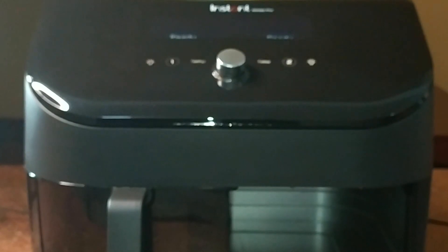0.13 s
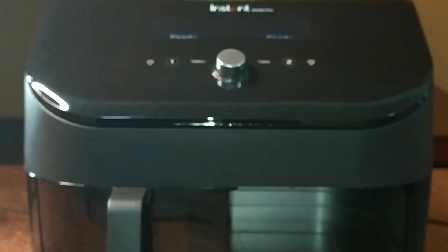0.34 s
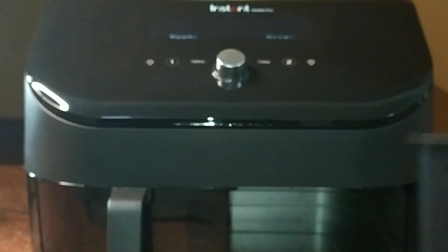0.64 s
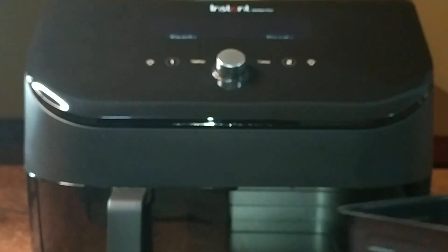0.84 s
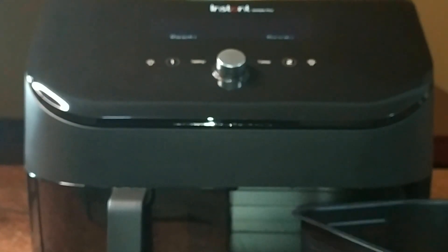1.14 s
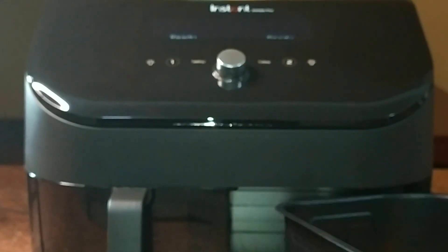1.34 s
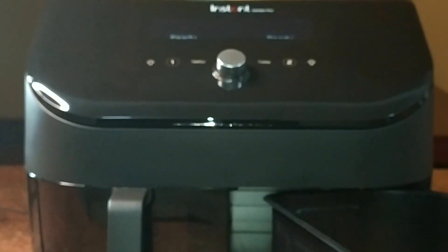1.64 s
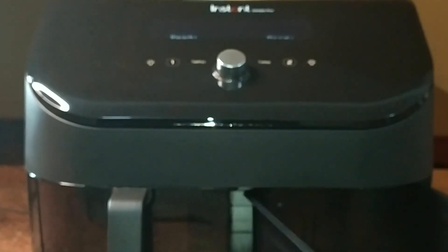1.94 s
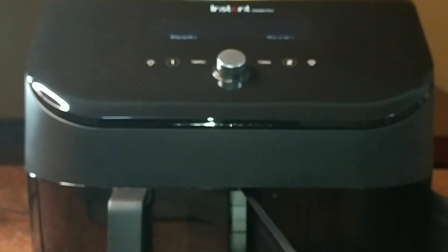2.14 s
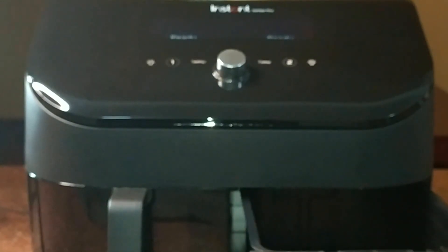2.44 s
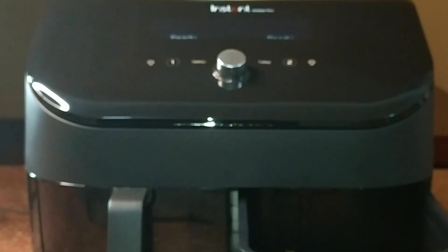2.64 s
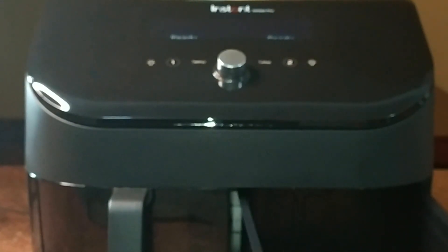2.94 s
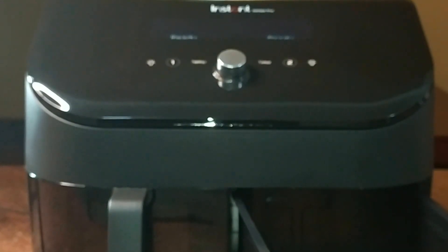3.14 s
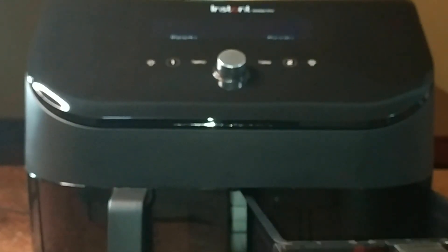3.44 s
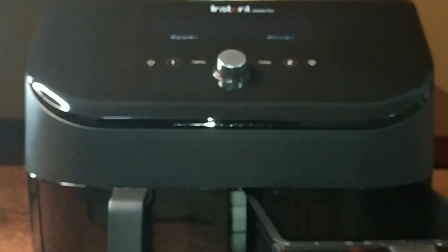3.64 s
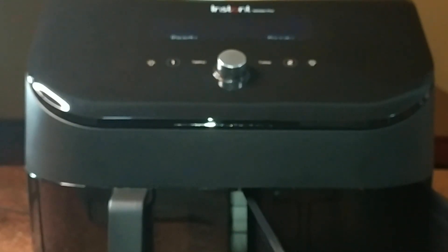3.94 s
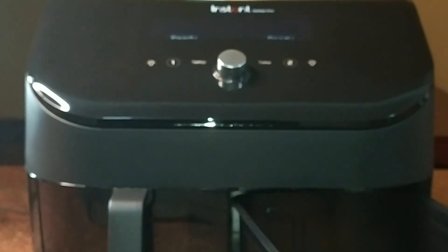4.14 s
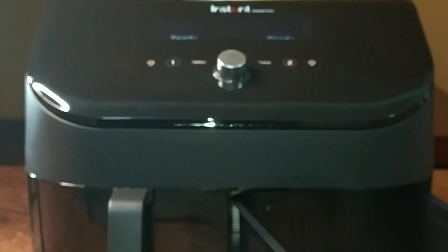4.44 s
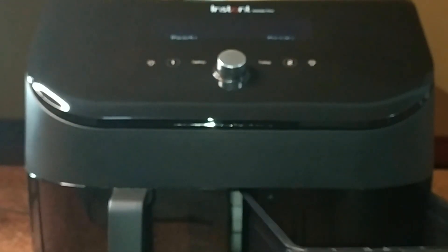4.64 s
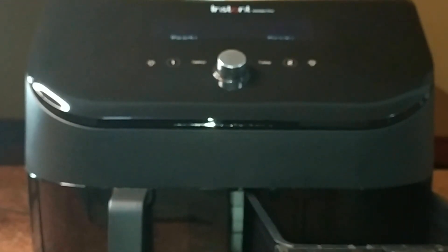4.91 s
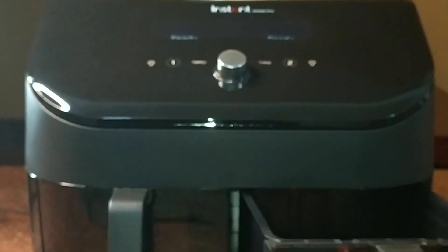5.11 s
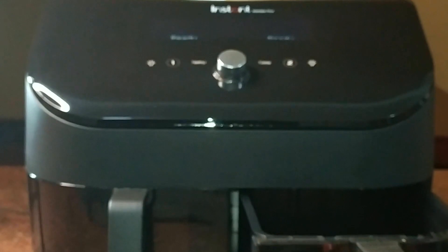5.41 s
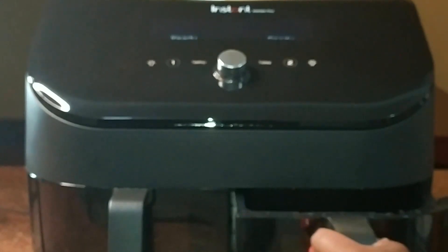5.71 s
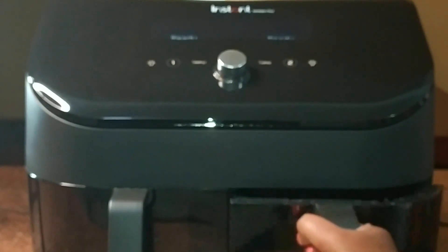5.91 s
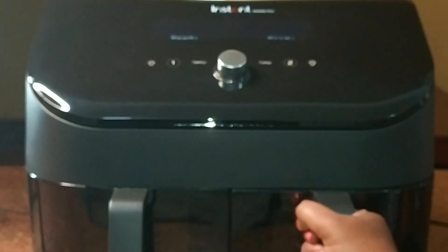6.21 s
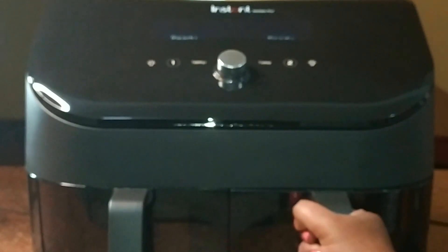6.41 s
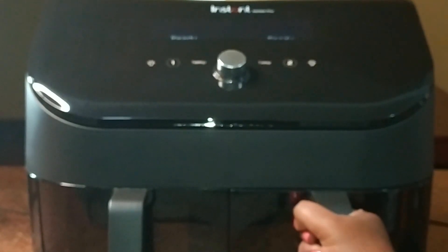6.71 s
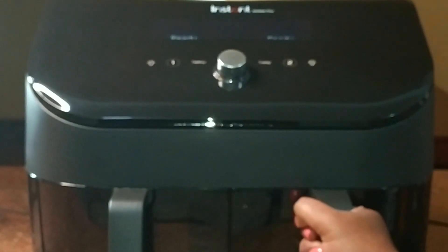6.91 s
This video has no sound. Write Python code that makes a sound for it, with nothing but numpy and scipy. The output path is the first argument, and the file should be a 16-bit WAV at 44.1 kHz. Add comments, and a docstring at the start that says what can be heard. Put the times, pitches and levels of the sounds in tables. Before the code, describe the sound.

Over a constant appliance hum, a hollow metal drawer bumps and drags along its runners, thuds home and its catch snaps closed.

```python
"""A steady appliance hum with faint whines and hissing air fills a kitchen, then comes a faint dull bump.
On the counter a metal air fryer basket is fed into its plastic bay: it catches on the opening, knocks
several times and scrapes along the runners, then is pushed home, where the catch snaps shut.
Blows are decaying modes and noise bursts, sliding is trains of tiny slips, the hum is sines over noise.
Direct sound and room reflections reach a left and a right side."""
import sys
import numpy as np
from scipy import signal
from scipy.fft import rfft, irfft, next_fast_len
from scipy.io import wavfile

SR = 44100
rng = np.random.default_rng(int(sys.argv[2]) if len(sys.argv) > 2 else 0)


def transcribe(signal):
    """Save signal, clipped to [-1, 1], as a 16-bit WAV file at the path in sys.argv[1]."""
    frames = np.atleast_2d(signal).T
    limited = np.clip(frames, -1, 1)
    pcm = np.round(limited * 32767).astype(np.int16)
    wavfile.write(sys.argv[1], SR, pcm)


N = 311342
TIME = np.arange(N) / SR
TAIL = TIME[:SR * 3 // 4]   # time axis of a single decay
CUTOFF_HZ = 15000
HUM_HZ = 445.2

# All dB below are before the gains set in the functions; decay times (t60) are those before any shortening.

# Motor hum. Each row: time in seconds, level in dB.
HUM_LEVEL = [(0, -50.5), (.8, -48), (1.5, -49.5), (4, -50), (7, -50)]
# Faint companions of the hum. Each row: pitch in Hz, rms level in dB.
WHINES = [(148.5, -72.5), (693, -81), (841.6, -80), (1236, -89), (4107, -81), (8087, -78), (8318, -83)]
# Colour of the moving air. Each row: frequency in Hz, relative level in dB.
AIR_COLOUR = [(20, -73), (50, -77), (100, -87), (135, -84), (150, -98), (170, -80.5), (300, -85),
              (600, -89), (1300, -100), (2100, -101), (2700, -89.5), (3300, -95), (3850, -104), (4130, -93),
              (4400, -102), (12000, -115)]
# Colour of the high background hiss. Each row: frequency in Hz, relative level in dB.
AIR_HISS_COLOUR = [(3000, -10.5), (5000, -15.5), (6600, -12), (7500, -0.5), (8200, 4.5), (9000, -1.5),
                   (10500, -4), (11500, -16.5), (15000, -24)]
# Course of that high hiss. Each row: time in seconds, level in dB.
AIR_HISS_LEVEL = [(0, -67.5), (.3, -66), (.8, -65), (1.3, -67), (1.8, -69), (7, -67)]

# Left-right likeness of diffuse sound. Each row: frequency in Hz, coherence from 0 to 1.
LIKENESS = [(30, 0.082), (130, 1), (320, 0.83), (500, 0.6), (950, 0.032), (2000, 0.073), (4500, 0.0091),
            (12000, 0.0099)]
# The basket's side. Each row: frequency in Hz, left minus right in dB.
SIDE_LEVEL = [(150, 0.5), (320, -0.5), (500, 3), (750, 1), (1090, 0), (1500, 0.5), (4500, 0), (9000, -3),
              (13000, 5)]
# Phase between the sides. Each row: frequency in Hz, lead of the left in radians.
SIDE_LEAD = [(150, 0.013), (320, -0.21), (500, 0.23), (900, -0.62), (2000, -0.63)]
# Colours of the room's ring and of its quick reflections. Each row: frequency in Hz, relative level in dB.
ROOM_COLOUR = [(100, 0.0), (250, 1.5), (500, -1.5), (1000, 6.0), (3000, -1.5), (10000, -4.0), (15000, -1)]
EARLY_COLOUR = [(100, -16.0), (600, 1.5), (2000, 0.5), (9000, 2.0)]

# Colour of the bump at pick-up. Each row: frequency in Hz, relative level in dB.
LIFT_COLOUR = [(100, -21), (200, 9), (500, -4), (1000, -8), (1500, -15), (3000, -17)]

# The basket's broad floor. Each row: frequency in Hz, level in dB, t60 in seconds.
FLOOR_MODES = [(235, 4, 0.33), (303.4, 5.5, 0.34), (357, -1.5, 0.27), (393, 2, 0.36), (417, -11, 0.35),
               (439.1, 10.5, 0.28), (495, 7.5, 0.27), (532.7, 6.5, 0.48), (694, 3, 0.099)]
# Its stiffer walls. Each row: frequency in Hz, level in dB, t60 in seconds.
WALL_MODES = [(841, 4, 0.4), (880, 3.5, 0.69), (1087, 4, 0.41), (1190, -13, 0.17), (1336, -20, 0.79),
              (1360, -28, .25), (1520, -12.5, 0.21), (1687, -10.5, 0.43), (2090, 2, 0.081), (2530, -27, .2)]
# The heavily damped first swing of a blow. Each row: ratio to the thud pitch, level in dB, t60 in seconds.
THUD_MODES = [(.66, -13.5, 0.053), (.85, -13, 0.13), (1.04, 0.5, 0.065)]
# The plastic casing's short ring. Each row: frequency in Hz, level in dB, t60 in seconds.
CASING_MODES = [(804, 0.5, 0.14), (1020, -35, 0.035), (1162, -8.5, 0.094), (1340, -27, 0.0085),
                (1740, -16, 0.034), (2105, 8, 0.0077), (2500, 0.5, 0.023), (2730, -43, 0.033)]
# The hollow casing's low ring. Each row: frequency in Hz, level in dB, t60 in seconds.
BOOM_MODES = [(155.2, -4, 0.33), (171.5, -6, 0.26), (238.4, 0, 0.29), (304.6, 5, 0.23)]
# Colour of the casing boom. Each row: frequency in Hz, relative level in dB.
BOOM_COLOUR = [(60, -37), (105, -42), (155, 2.5), (200, -9.5), (250, -2.5), (330, -12), (500, -7),
               (900, -70)]
# Colour of the plastic clack. Each row: frequency in Hz, relative level in dB.
CLACK_COLOUR = [(300, -33.5), (650, -7), (1000, 7.5), (1500, 3.5), (2000, 1), (2600, 0), (3050, -3),
                (6000, -8.5), (12000, -56)]
# Colour of the rim's tick. Each row: frequency in Hz, relative level in dB.
TICK_COLOUR = [(1500, 14), (3000, -5), (5000, -2), (7000, -3), (9200, 6.5), (10500, 0), (12000, -39),
               (15000, -52)]

# The hand feeds the basket in by short pushes. Each row: start of full speed in seconds, run-up in seconds,
# hold in seconds, speed as hiss in dB, pressure on the runners in dB.
PUSHES = [(1.97, 0.05, 0.058, -76, 29.5), (2.11, 0.13, 0.018, -47.5, 2), (2.19, 0.041, 0.026, -67.5, 28),
          (2.305, 0.17, 0.087, -42, 9.5), (2.46, 0.14, 0.12, -53.5, 9.5), (2.6, 0.31, 0.21, -59, 5.5),
          (3.087, .14, 0.071, -39.5, -1.5), (3.241, 0.036, 0.021, -42.5, 13),
          (3.371, 0.1, 0.037, -54.5, 19), (3.54, 0.24, 0.041, -51.5, 11), (3.641, 0.11, 0.024, -37, -1.5),
          (3.75, 0.038, 0.022, -70, 24), (3.87, 0.21, 0.016, -53.5, -1), (4.079, 0.089, 0.23, -42.5, -1),
          (4.55, 0.092, 0.23, -54, 16), (4.914, 0.13, 0.011, -40.5, 4.5), (5.031, 0.015, 0.2, -53.5, 7),
          (5.31, 0.12, 0.067, -44.5, 1), (5.699, 0.3, 0.28, -46, 2.5), (6.1, 0.15, 0.012, -64.5, 16.5),
          (6.219, 0.054, 0.058, -53.5, 14.5)]
RUN_DOWN = 0.49   # a push dies away over this many times its run-up
# Once the runners carry the basket, the vibration leaves its floor for the casing.
SEATED_S, SEATING_S, SEATED_CASING_DB, SEATED_FLOOR_DB = 5.95, 0.15, 13.5, -5
# Colour of the sliding hiss. Each row: frequency in Hz, relative level in dB.
HISS_COLOUR = [(1500, -8), (3300, -6.5), (5000, -13), (7000, -7.5), (9300, 1), (10500, -5), (12000, -18),
               (15000, -36)]
# Colour of the sliding rasp. Each row: frequency in Hz, relative level in dB.
RASP_COLOUR = [(60, -35.5), (250, -43), (500, 18), (680, -4), (870, 17), (1250, -0.5), (2000, 8.5),
               (2650, 12.5), (3200, -20), (5000, 6), (10000, -33)]
# Colour of the casing's rumble under sliding. Each row: frequency in Hz, relative level in dB.
RUMBLE_COLOUR = [(70, -11.5), (115, -8.0), (152, 14.0), (172, 20.5), (205, -16), (300, 9), (380, -2.0),
                 (800, -58)]
# The drawer's plastic sides rub the mouth of the bay. Each row: loudest time in seconds, length in seconds,
# level in dB.
RUBS = [(4.119, 0.15, -46), (5.97, 0.31, -55.5), (6.225, 0.3, -56)]
# Colour of those rubs. Each row: frequency in Hz, relative level in dB.
RUB_COLOUR = [(600, -7), (1300, 0), (2400, -6), (3500, -3), (7000, -4), (11000, -10), (13000, -40)]
# Resonances that bits of grit set off between rim and runner. Each row: frequency in Hz, level in dB.
GRIT_MODES = [(880, -0.5), (1120, -13), (1480, 2), (1900, 1.5), (2300, -6), (2600, 1.5), (2780, 0),
              (3700, -5)]
# The rim skids along the opening. Each row: start in seconds, level in dB, t60 in seconds.
SKIDS = [(2.03, -50, 0.11), (2.24, -31, 0.056), (2.371, -50, 0.094), (2.995, -59, .08), (3.105, -38, 0.21),
         (3.237, -41, 0.13), (4.264, -32.5, 0.1), (4.682, -33.5, 0.065)]
# Colour of the skidding rim. Each row: frequency in Hz, relative level in dB.
SKID_COLOUR = [(600, -9), (1300, 9), (2100, 1.5), (2650, 3.5), (3300, -6), (6000, -5), (9300, -1),
               (11000, -6), (13000, -64)]
# Stick-slip groans of the basket floor. Each row: loudest time in seconds, length in seconds, pitch in Hz,
# level in dB.
GROANS = [(3.584, 0.089, 495, -42.5), (4.79, 0.16, 440.7, -44.5), (4.859, 0.18, 439.4, -34),
          (5.676, 0.037, 520, -40.5), (5.705, 0.033, 535, -36.5), (5.738, 0.11, 530, -38)]

# Small dry ticks, alone or at the sharp start of a knock or bump. Each row: start in seconds, level in dB,
# pitch in Hz, treble in dB relative to that pitch.
TICKS = [(1.9186, -28.5, 2090, -22.5), (2.154, -28, 1690, -28), (2.237, -25.5, 2530, -13),
         (2.273, -30.5, 2500, -22), (2.317, -37, 2600, -14), (2.333, -32, 1300, -12),
         (2.349, -33, 2500, -6), (3.126, -27, 1510, 3), (3.246, -29.5, 1500, -9), (3.368, -33, 1220, -26),
         (3.634, -32, 2200, -5), (4.2677, -22, 1500, -1.5), (4.283, -26, 2100, -19),
         (5.975, -42, 1200, -19), (5.989, -33, 1190, -31), (6.1779, -32, 1437, -25),
         (6.2508, -33, 1500, -13), (6.259, -29.5, 1300, -4), (6.318, -49.5, 1300, -17),
         (6.398, -26.5, 1980, -27.5), (6.8998, -33.5, 1910, -28)]
# The drawer's plastic front meets the casing. Each row: start in seconds, thud in dB, casing boom in dB,
# snap in dB, snap pitch in Hz.
BUMPS = [(6.398, -31.5, -30, -29.5, 1720), (6.422, -47, -34.5, -52, 1290), (6.846, -57, -50.5, -44, 1140),
         (6.894, -50, -51, -43, 1700), (6.8999, -32, -50, -32, 1540), (6.917, -43, -43, -45, 1100),
         (6.936, -29, -38, -42, 1100)]
# Colour of that snap. Each row: ratio to the snap pitch, relative level in dB.
SNAP_SHAPE = [(.25, 2.5), (.55, 0), (.85, 1.5), (1.35, -6), (1.6, -12), (2, -15), (5, -51)]
# The drawer rides over its catch and seats. Each row: start in seconds, thump in dB, crack in dB, spring in dB.
CATCH = [(7.0135, -38, -33, -28), (7.0222, -24, -28, -30), (7.0443, -24, -17.5, -2)]
# Colour of the plastic crack. Each row: frequency in Hz, relative level in dB.
CRACK_COLOUR = [(300, -19), (1100, -10.5), (2200, -11.5), (2900, -13.5), (4000, -20.5), (7000, -21.5),
                (9200, -24), (10500, -20), (12000, -36), (15000, -38)]
# Colour of the rattling spring. Each row: frequency in Hz, relative level in dB.
SPRING_COLOUR = [(6000, -13), (8200, -6), (9150, -1), (10200, -10), (11000, -12), (12500, -36),
                 (15000, -55)]
# The metal basket hits the bay. Each row: start in seconds, strength in dB, thud pitch in Hz, hardness of the
# contact in dB, how freely the walls ring in dB, time to the rebound in seconds, change per rebound in dB,
# casing boom in dB.
KNOCKS = [(1.919, -28.5, 551, 8, 4, .017, -23, -33.5), (2.028, -32, 544, 1.5, 2, .018, -9, -40),
          (2.155, -27, 517, 0, 1, .021, -7, -33), (2.230, -20.5, 465, -13, -11, .032, -9, -30),
          (2.372, -15.5, 496, -5, -26, .0039, 0.5, -43), (2.423, -26, 480, 4, -16, .022, -4, -44),
          (2.993, -35, 494, -17, -12, .004, -2.5, -76), (3.103, -7, 455, -3.5, -11.5, .0108, -2, -41),
          (3.151, -17, 470, -25, -6.5, .014, -6.5, -46), (3.181, -18.5, 448, -12, -3, .023, -3.5, -40),
          (3.311, -21, 505, -4, -2, .021, -7, -32.5), (3.704, -20, 397, -3.5, -8, .016, -4.5, -40),
          (4.266, -5.5, 500, -4, -4, .0235, -6, -32), (4.298, -10.5, 520, -10, -23, .028, -14, -34),
          (4.681, -23, 483, -8, -2, .014, -2, -38), (4.768, -31, 470, -5, 6.5, .018, -4.5, -48),
          (4.958, -19.5, 490, -1, -4, .01, -9.5, -42), (5.113, -11, 470, -9, -9.5, .015, -5.5, -26.5),
          (5.808, -34, 505, -17, -3, .018, -11, -42.5), (5.882, -32.5, 450, -16, 0, .018, -9, -40.5),
          (5.994, -22.5, 340, -16, -11, .023, -7.5, -35.5), (6.065, -30.5, 378, -1, -19, .03, -11, -40),
          (6.179, -28.5, 404, 0, -7, .019, -12, -38), (6.253, -21.5, 374, -1.5, -11, .008, -11, -40)]
REBOUND_PITCH = 0.955   # each rebound thuds lower than the touch before


def from_db(db):
    """Decibels to gain."""
    return 10 ** (np.asarray(db) / 20)


def rms_one(x):
    """Scale to rms 1."""
    return x / np.sqrt(np.mean(x ** 2) + 1e-20)


def in_time(rows):
    """Read a curve of (seconds, value) at every sample."""
    s, value = np.transpose(rows)
    return np.interp(TIME, s, value)


def at_hz(points, hz):
    """Read a table on a log-frequency axis."""
    f, value = np.transpose(points)
    return np.interp(np.log(hz + 1), np.log(f), value)


def dying(t60):
    """A free decay, 60 dB down after t60 seconds."""
    return np.exp(-np.log(1000) * TAIL / t60)


def swelling(s, length):
    """A rise and fall centred on a time."""
    return np.cos(np.pi * np.clip((TIME - s) / length, -.5, .5))


def drift(rate):
    """Smooth chance with rms 1, from a new random value `rate` times a second."""
    knots = rng.standard_normal(int(N / SR * rate) + 2)
    return rms_one(np.interp(TIME * rate, np.arange(len(knots)), knots))


def colour(x, spectrum):
    """Give a steady signal a spectrum; rms 1."""
    length = x.shape[-1]
    size = next_fast_len(length)
    gain = from_db(at_hz(spectrum, np.fft.rfftfreq(size, 1 / SR)))
    return rms_one(irfft(rfft(x, size) * gain, size)[..., :length])


def diffuse(size):
    """White stereo noise from all round: most alike in the bass, nearly unrelated in the treble."""
    padded = next_fast_len(size)
    alike = np.clip(at_hz(LIKENESS, np.fft.rfftfreq(padded, 1 / SR)), -1, 1)
    mid, side = rfft(rng.standard_normal((2, padded)))
    pair = np.sqrt(1 + alike) * mid + np.sqrt(1 - alike) * side * [[1], [-1]]
    return rms_one(irfft(pair, padded)[:, :size])


def ringing(modes, spread_db=0, shorten=1, pitch=1):
    """Modes struck together; the place of contact gives each its own strength."""
    strengths = spread_db * rng.standard_normal(len(modes))
    out = np.zeros(len(TAIL))
    for (hz, db, t60), own in zip(modes, strengths):
        out += from_db(db + own) * np.sin(2 * np.pi * hz * pitch * TAIL) * dying(t60 * shorten)
    return out


def burst(spectrum, t60):
    """Many crowded modes that die together, as coloured noise under one decay."""
    return colour(rng.standard_normal(len(TAIL)), spectrum) * dying(t60)


def radiate(x, edge_hz):
    """A small body sends out little below its lowest resonance."""
    return signal.sosfilt(signal.butter(4, edge_hz, "high", fs=SR, output="sos"), x)


def add(track, s, sound):
    """Mix a sound in at a time in seconds."""
    start = int(s * SR)
    track[start:start + len(sound)] += sound[:max(N - start, 0)]


def appliance(air_db=-64, hiss_db=4.0, hum_lead=0.59, hum_lean_db=-.5, whine_flutter_db=2.5):
    """A motor hums on one clean note, with faint whines, moving air and a high hiss."""
    phase = 2 * np.pi * HUM_HZ * TIME + .05 * drift(3.7)
    lean = np.array([[hum_lean_db], [-hum_lean_db]])
    level = from_db(in_time(HUM_LEVEL) + 0.083 * drift(0.33) + lean)
    out = np.sqrt(2) * level * np.sin(phase + np.array([[hum_lead], [0]]))   # the left leads, in radians
    for hz, db in WHINES:
        wander = np.cumsum(drift(29)) / SR * (1 + 0.0018 * hz)   # in cycles
        flutter = from_db(db + whine_flutter_db * drift(45))
        side_phase = rng.uniform(0, np.pi, (2, 1))
        out += np.sqrt(2) * flutter * np.sin(2 * np.pi * (hz * TIME + wander) + side_phase)
    out += from_db(air_db) * colour(diffuse(N), AIR_COLOUR)
    return out + from_db(in_time(AIR_HISS_LEVEL) + hiss_db) * colour(diffuse(N), AIR_HISS_COLOUR)


def kitchen(x, wet_db, t60=0.58, early_t60=0.17, early_db=-1, shade_db=-6):
    """Direct sound, quick reflections from counter and wall, then the ring of the room."""
    late = colour(diffuse(len(TAIL)), ROOM_COLOUR) * (dying(t60) - dying(0.016))
    early = colour(diffuse(len(TAIL)), EARLY_COLOUR) * (dying(early_t60) - dying(0.0027))
    reflections = rms_one(late) + from_db(early_db) * rms_one(early)
    response = from_db(wet_db) * reflections / np.sqrt(len(TAIL))
    size = next_fast_len(N + len(TAIL))
    hz = np.fft.rfftfreq(size, 1 / SR)
    direct = from_db(at_hz([(700, 0.0085), (4500, shade_db)], hz))   # the bay hides treble from the direct path
    sides = np.array([[.5], [-.5]])
    lean = from_db(at_hz(SIDE_LEVEL, hz) * sides) * np.exp(1j * at_hz(SIDE_LEAD, hz) * sides)
    return irfft(rfft(x, size) * (direct + rfft(response, size)) * lean, size)[:, :N]


def shifting(x, wet_db, sway_s=1.1017):
    """As the basket moves, its sound passes back and forth between two reflection patterns."""
    share = np.sin(np.pi * TIME / sway_s) ** 2
    return kitchen(x * share, wet_db) + kitchen(x * (1 - share), wet_db)


def lifting(at_s=0.075, level_db=-61):
    """A faint dull bump as the basket is picked up: one low noise burst."""
    out = np.zeros(N)
    add(out, at_s, from_db(level_db) * burst(LIFT_COLOUR, t60=0.6))
    return out


def pushing():
    """Each push runs up, holds and dies away: dB of the speed, and of the drive (speed and pressure)."""
    speed, drive = np.zeros((2, N)) + 1e-14
    for s, run_up, held, db, pressure in PUSHES:
        before = np.maximum(s - TIME, 0) / run_up
        after = np.maximum(TIME - s - held, 0) / (RUN_DOWN * run_up)
        power = from_db(db - 20 * np.minimum(before + after, 10)) ** 2
        speed += power
        drive += power * from_db(pressure) ** 2
    return 10 * np.log10(speed), 10 * np.log10(drive)


def friction(per_s, size_db, judder_db):
    """Tiny slips of uneven size, swelling and thinning in strength."""
    slips = (rng.random(N) < per_s / SR) * rng.choice([-1, 1], N)
    sizes = from_db(size_db * np.minimum(rng.exponential(1, N), 4))
    return slips * sizes * from_db(judder_db * drift(55))


def rubs():
    """Plastic on plastic: a broad, grainy rub made of small slips."""
    level = sum(from_db(db) * swelling(s, length) for s, length, db in RUBS)
    return level * colour(friction(per_s=2500, size_db=1.5, judder_db=-0.5), RUB_COLOUR)


def sliding(hiss_db=-3, rasp_db=-15.0, wall_db=-20, drone_db=-4, rumble_db=-15, floor_hz=470,
            rasp_follows=0.4):
    """Slips hiss and rasp on the runners; under pressure they also drive the basket and the casing."""
    speed, drive = pushing()
    seated = np.clip((TIME - SEATED_S) / SEATING_S, 0, 1)
    rasp = speed + rasp_follows * (drive - speed)
    drone = drive + SEATED_FLOOR_DB * seated
    rumble = drive + SEATED_CASING_DB * seated
    fine = friction(per_s=7500, size_db=3.0, judder_db=3.0)
    coarse = friction(per_s=2500, size_db=0.3, judder_db=-1.5)
    floor = ringing(THUD_MODES, pitch=floor_hz) + from_db(-24.5) * ringing(FLOOR_MODES, shorten=0.36)
    walls = ringing(WALL_MODES, shorten=0.11)   # the runners damp the ring
    driven_floor = radiate(signal.fftconvolve(coarse, floor)[:N], edge_hz=229)
    driven_walls = signal.fftconvolve(coarse, walls)[:N]
    out = from_db(speed + hiss_db) * colour(fine, HISS_COLOUR)
    out += from_db(rasp + rasp_db) * colour(fine, RASP_COLOUR)
    out += from_db(drone + drone_db) * rms_one(driven_floor)
    out += from_db(rasp + wall_db) * rms_one(driven_walls)
    out += from_db(rumble + rumble_db) * colour(coarse, RUMBLE_COLOUR)
    return out * (TIME > KNOCKS[0][0])   # nothing rubs before the first knock


def grit(level_db=-11, pressure_follows=0.65, cycles=22):
    """Bigger slips as the basket drags; each rings one resonance, 60 dB down after `cycles` cycles."""
    speed, drive = pushing()
    slips = friction(per_s=330, size_db=3.5, judder_db=3.0)
    dealt, out = rng.integers(0, len(GRIT_MODES), N), np.zeros(N)
    for k, (hz, db) in enumerate(GRIT_MODES):
        r, w = from_db(-60 * hz / (cycles * SR)), 2 * np.pi * hz / SR   # pole radius and angle
        struck = slips * (dealt == k) + 1e-18
        out += from_db(db) * signal.lfilter([0, np.sin(w)], [1, -2 * r * np.cos(w), r * r], struck)
    level = from_db(level_db + speed + pressure_follows * (drive - speed))
    return level * rms_one(radiate(out, edge_hz=620)) * (TIME > KNOCKS[0][0])


def skids():
    """Where it strikes at a slant the rim skids on: a gritty scrape that dies as the basket slows."""
    level = np.zeros(N)
    for s, db, t60 in SKIDS:
        add(level, s, from_db(db) * dying(t60))
    return level * colour(friction(per_s=3900, size_db=11.0, judder_db=-0.5), SKID_COLOUR)


def groans(level_db=-1, octave_db=-20, waver=0.0084, rough_db=-1.5):
    """Pressed hard, the slips lock on to a floor mode and the basket sings unsteadily, swelling and fading."""
    out = np.zeros(N)
    for s, length, pitch, db in GROANS:
        phase = 2 * np.pi * np.cumsum(pitch * (1 + waver * drift(70))) / SR
        tone = np.sin(phase) + from_db(octave_db) * np.sin(2 * phase)
        out += swelling(s, length) * from_db(db + level_db) * tone
    return np.sqrt(2) * out * from_db(rough_db * drift(98))


def ticks(level_db=0, t60=0.0079):
    """Small dry ticks, each a very short noise burst with its own pitch and sharpness."""
    out = np.zeros(N)
    for s, db, pitch, treble in TICKS:
        shape = [(pitch / 4, -20), (pitch, 0), (2 * pitch, treble), (10000, treble - 4), (13000, treble - 35)]
        add(out, s, from_db(db + level_db) * burst(shape, t60=t60))
    return out


def bumps(front_hz=368, snap_t60=0.04, ring_db=-20, swell_s=0.019):
    """Plastic on plastic: a dull thud, a boom and a short snap."""
    out, swell = np.zeros(N), 1 - dying(swell_s)
    for s, thud, boom, snap, pitch in BUMPS:
        front = from_db(thud) * ringing(THUD_MODES, pitch=front_hz)
        add(out, s, swell * (front + from_db(boom) * burst(BOOM_COLOUR, t60=0.13)))
        snap_colour = [(ratio * pitch, db) for ratio, db in SNAP_SHAPE]
        add(out, s, from_db(snap) * (1 - dying(0.0041)) * burst(snap_colour, t60=snap_t60))
        add(out, s, from_db(snap + ring_db) * ringing(CASING_MODES, spread_db=6.5))
    return radiate(out, edge_hz=180)


def catch(spring_hz=9050, front_hz=370, front_db=4.5, ping_db=-3, rattle_db=-4.5):
    """The drawer front thumps home, the plastic cracks, the spring gives a very short, bright ping and rattle."""
    out = np.zeros(N)
    ping = 2 * np.sin(2 * np.pi * spring_hz * TAIL) * (dying(.009) - dying(.0025))
    for s, thump, crack, spring in CATCH:
        add(out, s, from_db(thump) * (1 - dying(.008)) * burst(BOOM_COLOUR, t60=.13))
        add(out, s, from_db(thump + front_db) * ringing(THUD_MODES, pitch=front_hz))
        add(out, s, from_db(crack) * burst(CRACK_COLOUR, t60=.06))
        rattle = (1 - dying(.003)) * burst(SPRING_COLOUR, t60=.016)
        add(out, s, from_db(spring) * (from_db(ping_db) * ping + from_db(rattle_db) * rattle))
    return radiate(out, edge_hz=114)


def knocks(thud_db=-1.0, thud_shorten=0.72, floor_db=-16, wall_db=-18, clack_db=-20, casing_db=-27,
           tick_db=-21, boom_db=-3, boom_ring_db=0, swell_s=0.01, scuff_s=.0015, chatter_db=5.5, count=3):
    """The rim scuffs, then the blow swings the floor, booms the casing, rings the walls and rebounds.

    Returns the contacts, the first swings and the long ring."""
    basket, thuds, casing, edge, walls = np.zeros((5, N))
    swell = 1 - dying(swell_s)   # the heavy parts need a cycle or two to get moving
    for first, peak, pitch, hard, wall, gap, loss, boom in KNOCKS:
        floor = floor_db + 0.26 * wall + SEATED_FLOOR_DB * (first > SEATED_S)   # the runners damp the floor
        for k in range(count):   # the first touch and its rebounds
            s, db = first + k * gap, peak + k * loss
            swing = ringing(THUD_MODES, shorten=thud_shorten, pitch=pitch * REBOUND_PITCH ** k)
            add(thuds, s, from_db(db + thud_db) * swell * swing)
            floor_ring = ringing(FLOOR_MODES, spread_db=4.0, shorten=0.36)
            add(basket, s, from_db(db + floor) * swell * floor_ring)
            add(edge, s - scuff_s, from_db(db + hard + clack_db) * burst(CLACK_COLOUR, t60=.055))
            add(edge, s, from_db(db + hard + casing_db) * ringing(CASING_MODES, spread_db=5.0))
        # after a light blow the wall stays pressed to the bay and is damped
        free = np.clip(from_db(0.5 * (peak + wall + 2.5)), .4, 1)
        wall_ring = ringing(WALL_MODES, spread_db=2.5, shorten=free)
        add(walls, first, from_db(peak + wall + wall_db) * (1 - dying(0.055)) * wall_ring)
        add(casing, first, from_db(boom + boom_db) * swell * burst(BOOM_COLOUR, t60=0.19))
        low_ring = ringing(BOOM_MODES, spread_db=0.5)
        add(walls, first, from_db(boom + boom_ring_db) * (1 - dying(0.19)) * low_ring)
        # only the first touch ticks
        add(edge, first - scuff_s, from_db(peak + hard + tick_db) * burst(TICK_COLOUR, t60=0.048))
    edge *= from_db(chatter_db * drift(250))   # the rim chatters while it is in contact
    contacts = radiate(basket + edge, edge_hz=300) + radiate(casing, edge_hz=180)
    return contacts, radiate(thuds, edge_hz=286), walls


def scene():
    """The basket in the kitchen over the hum, each group of sounds with its own share of reflections."""
    contacts, thuds, walls = knocks()
    # the pick-up bump, contacts, skids, sliding and catch come with the most reflections
    reverberant = lifting() + contacts + skids() + sliding() + catch()
    swings = kitchen(thuds, wet_db=-7.0) + kitchen(walls + groans(), wet_db=-8.0)
    # ticks, grit and rubs keep more treble in their direct sound
    bright = kitchen(ticks() + grit() + rubs(), wet_db=-7.0, shade_db=-3.0)
    front = kitchen(bumps(), wet_db=-4.0, t60=0.73)
    return shifting(reverberant, wet_db=0.5) + swings + bright + front + appliance()


def record(dry):
    """The top is cut steeply above the cutoff."""
    return signal.sosfilt(signal.ellip(10, .2, 80, CUTOFF_HZ, fs=SR, output="sos"), dry)


dry = scene()
out = record(dry)
transcribe(out)
```